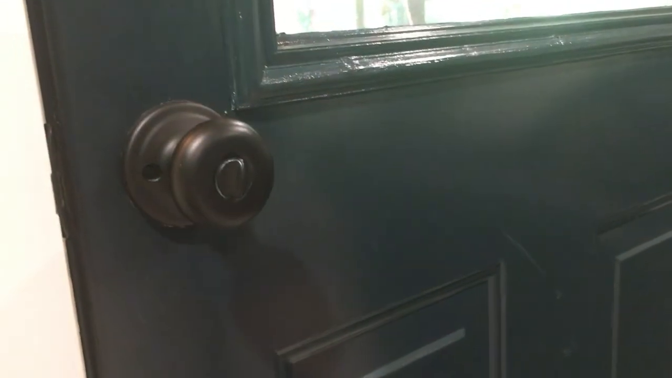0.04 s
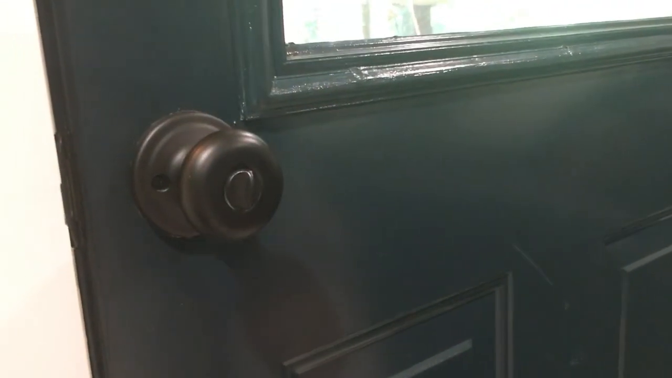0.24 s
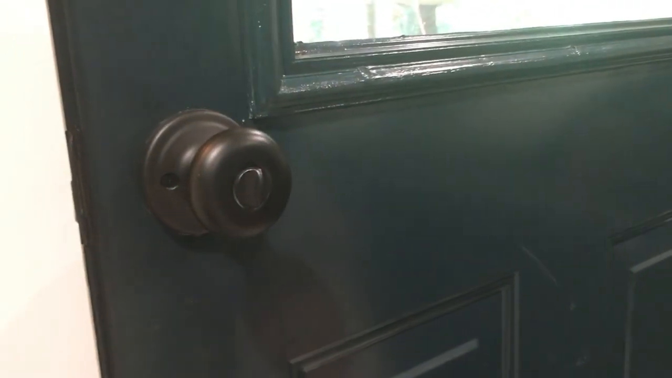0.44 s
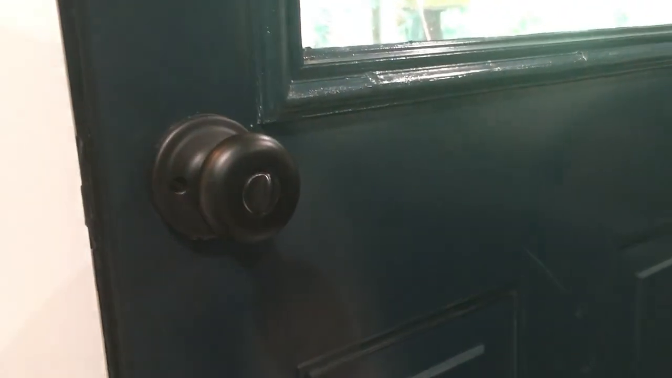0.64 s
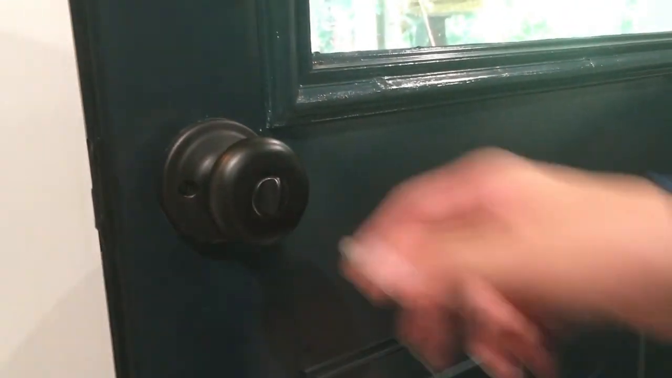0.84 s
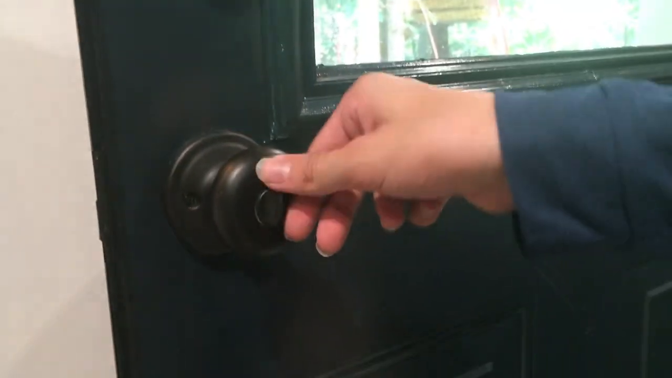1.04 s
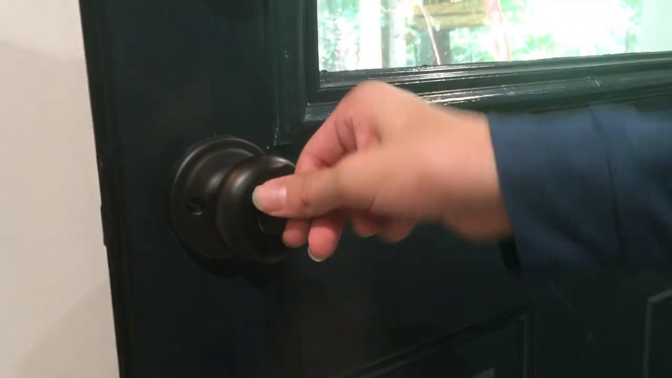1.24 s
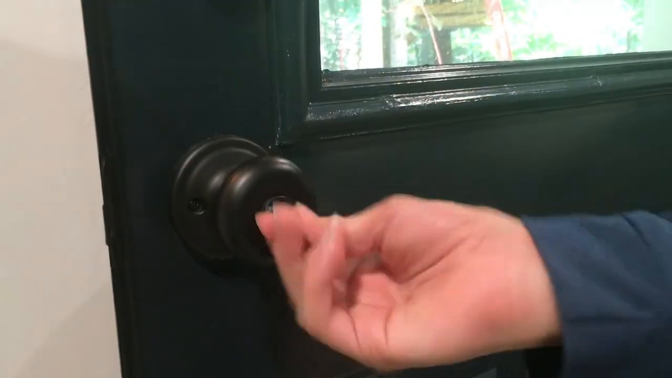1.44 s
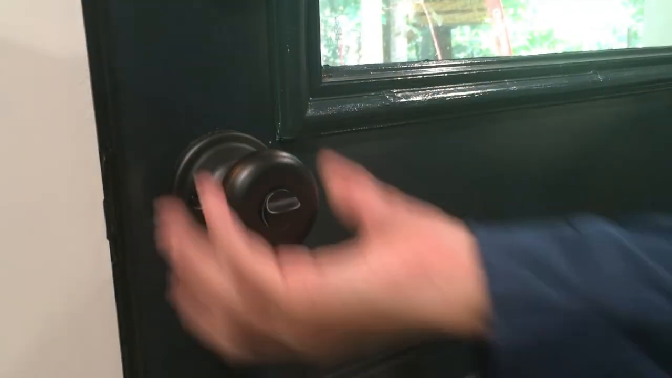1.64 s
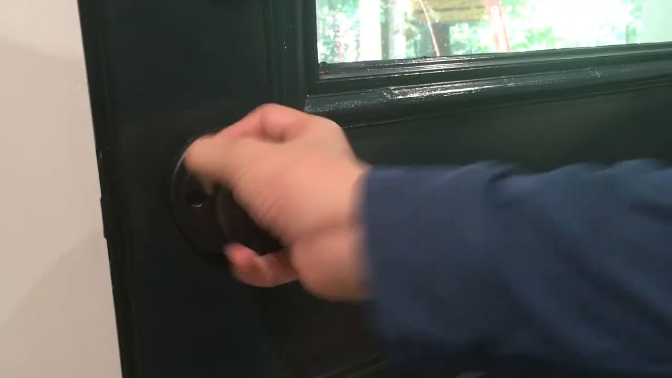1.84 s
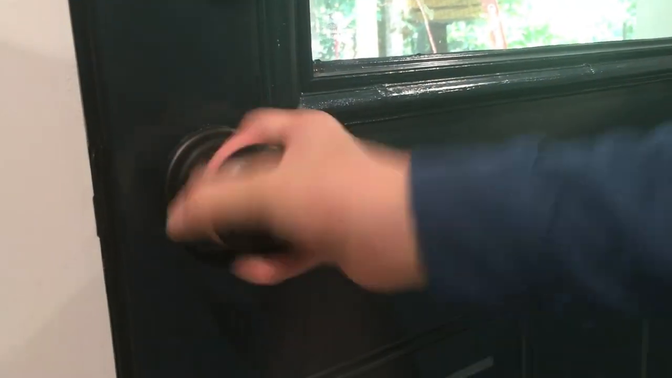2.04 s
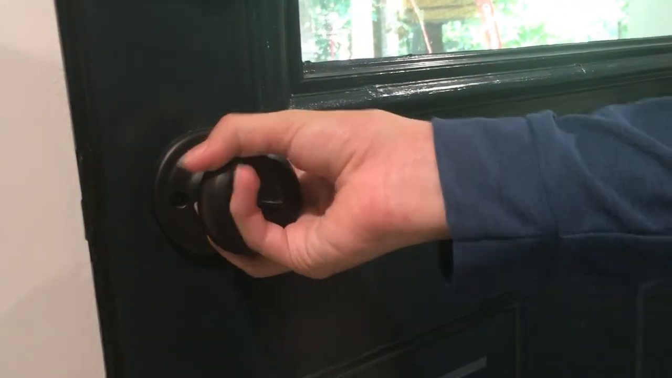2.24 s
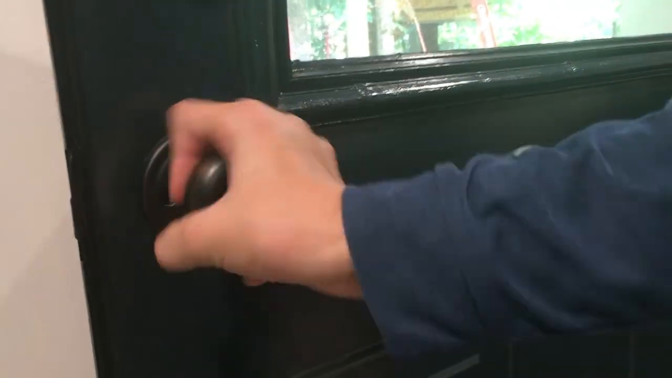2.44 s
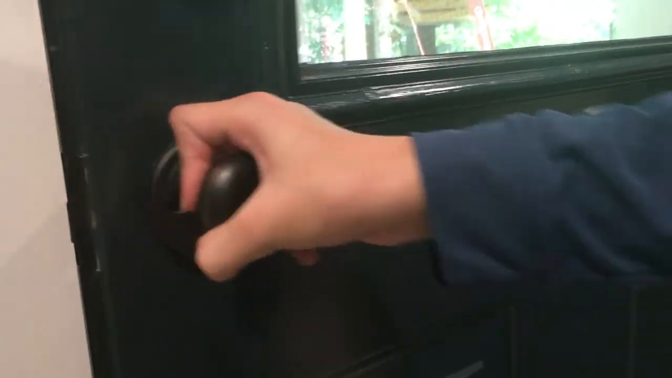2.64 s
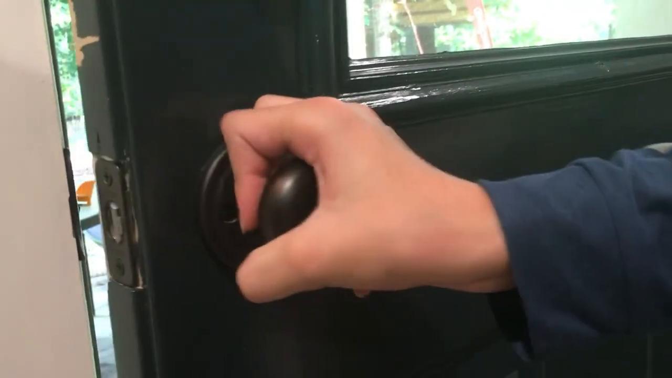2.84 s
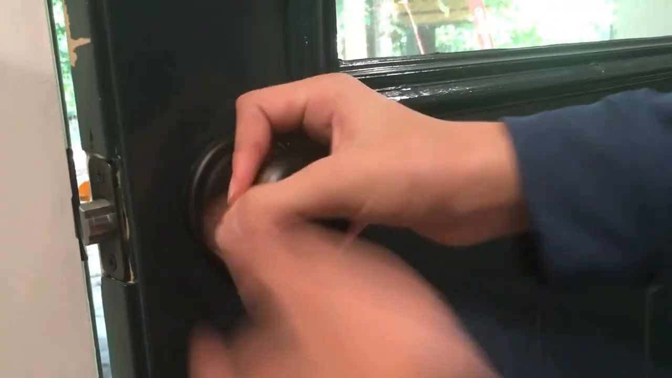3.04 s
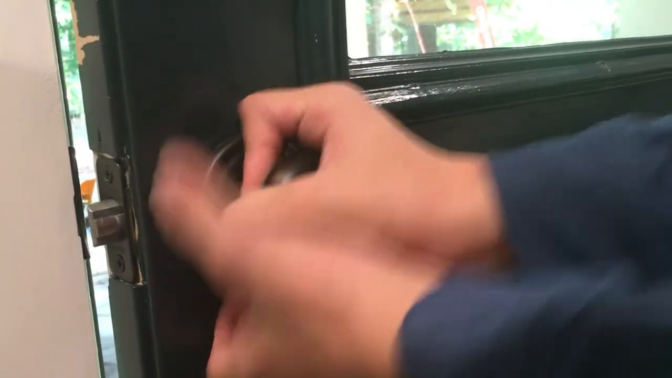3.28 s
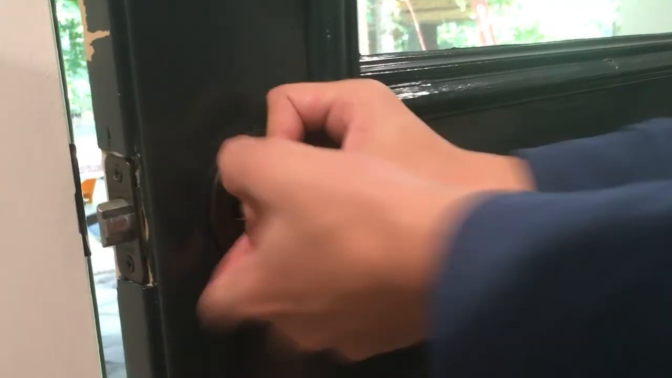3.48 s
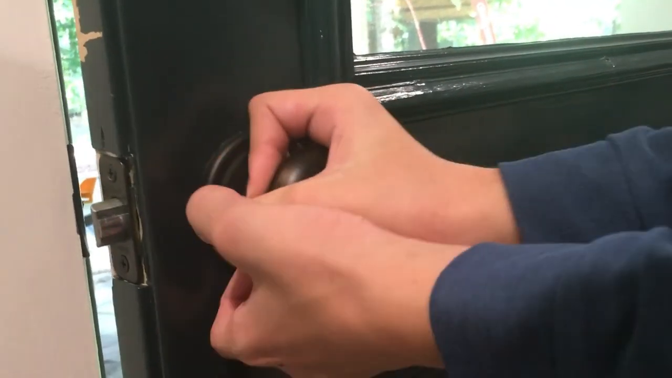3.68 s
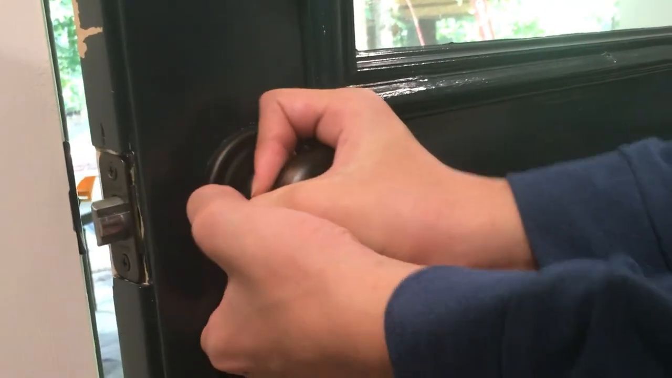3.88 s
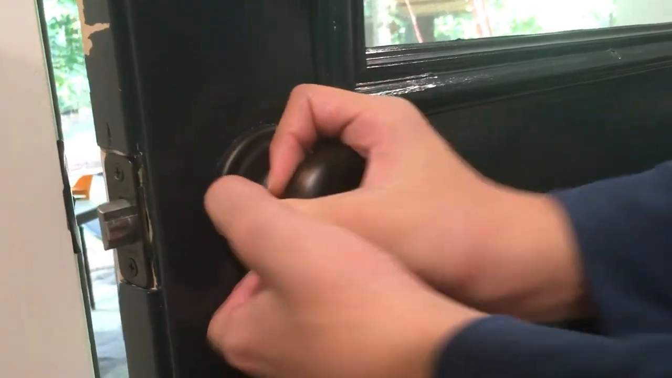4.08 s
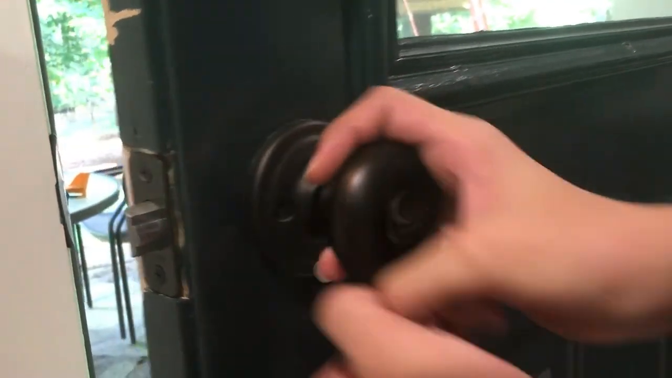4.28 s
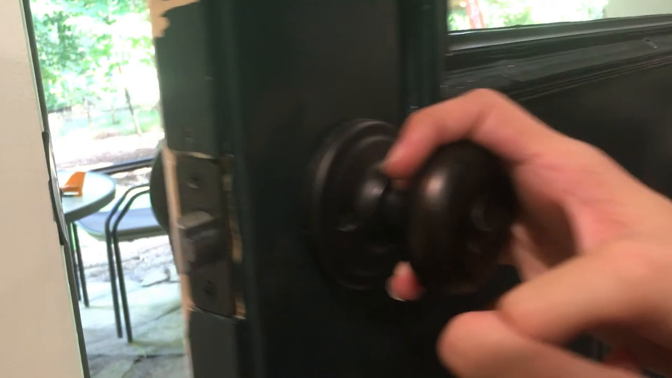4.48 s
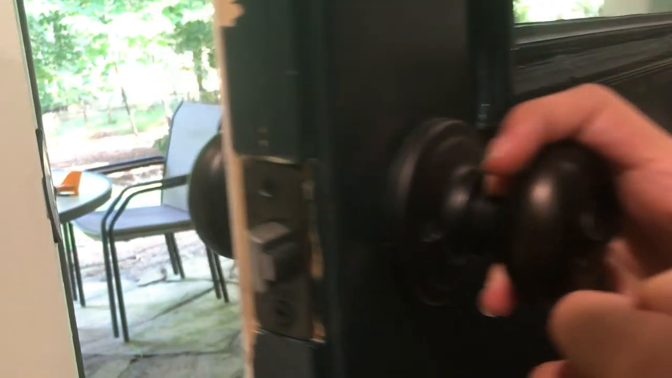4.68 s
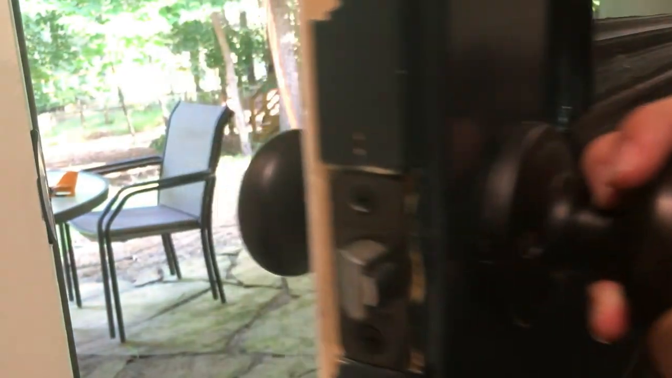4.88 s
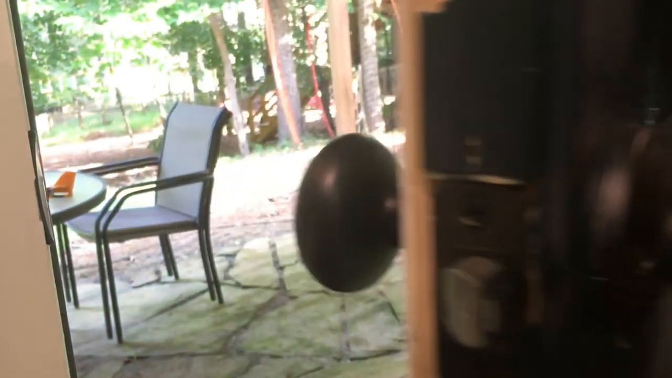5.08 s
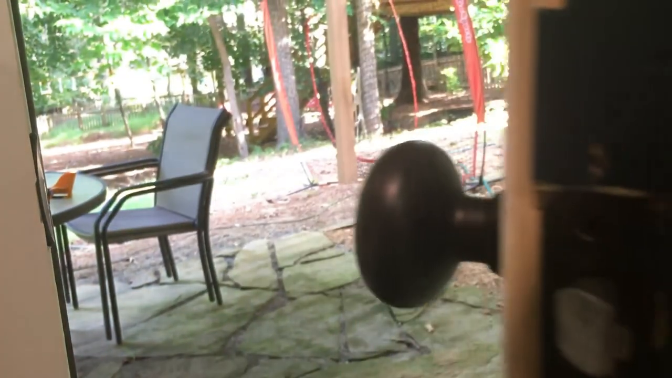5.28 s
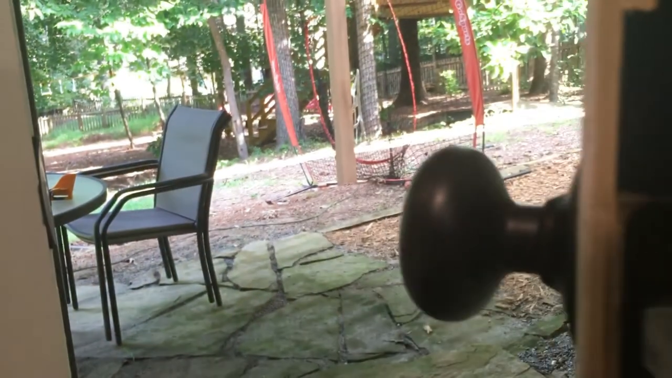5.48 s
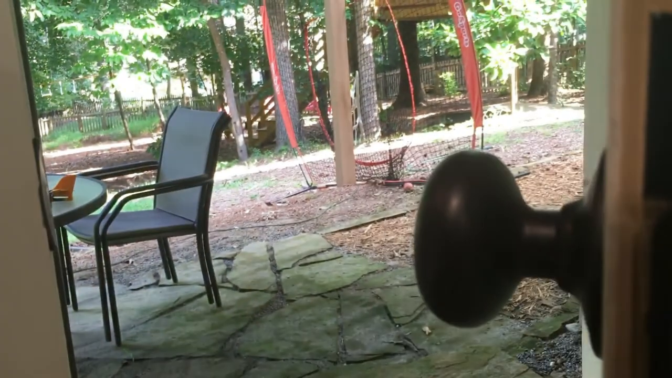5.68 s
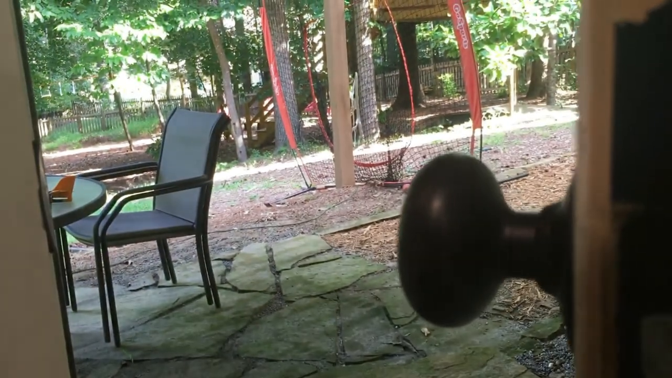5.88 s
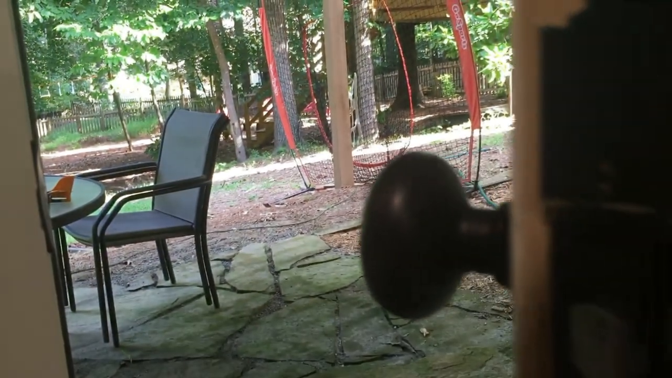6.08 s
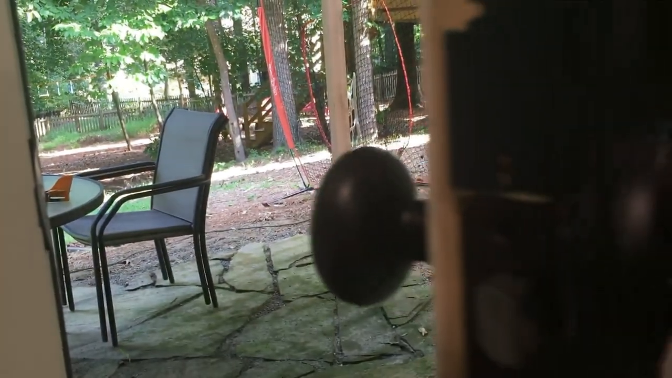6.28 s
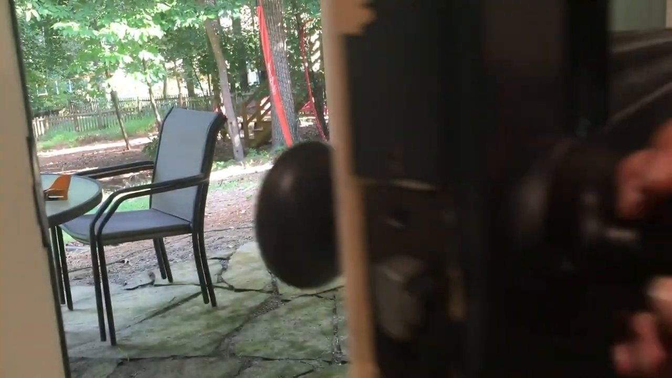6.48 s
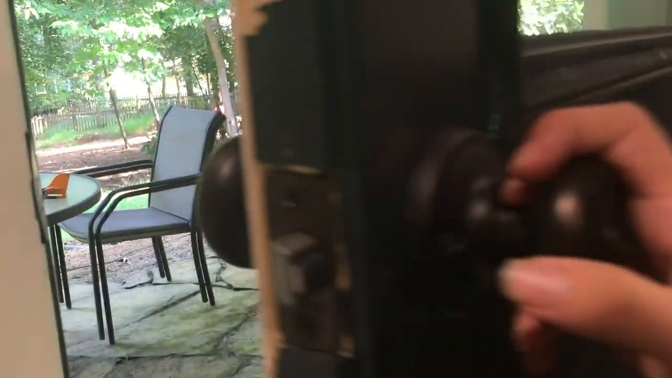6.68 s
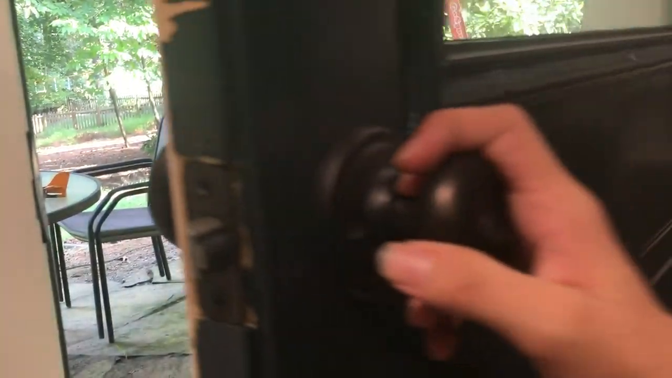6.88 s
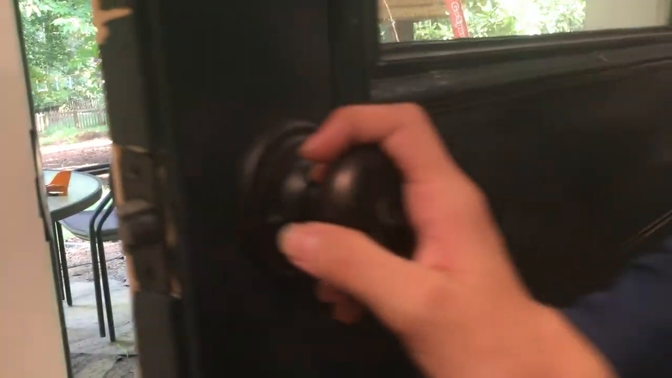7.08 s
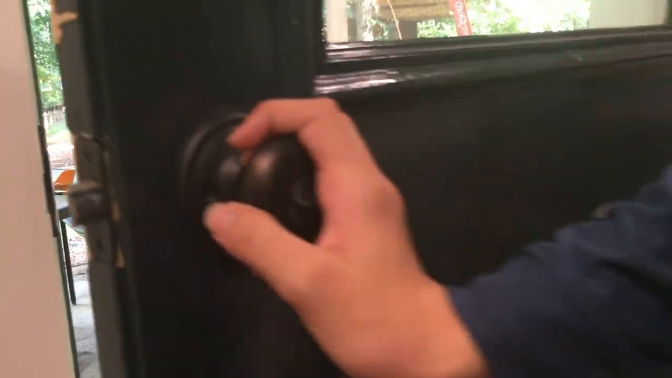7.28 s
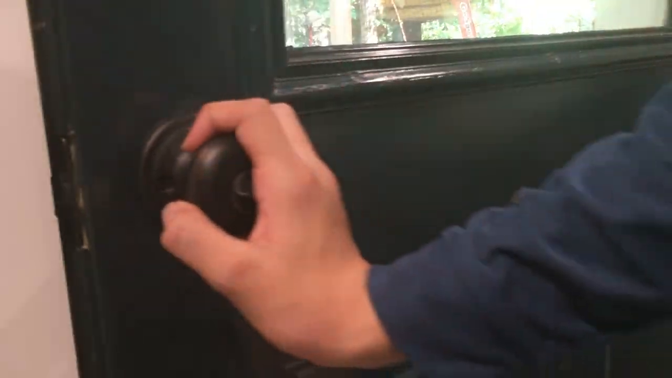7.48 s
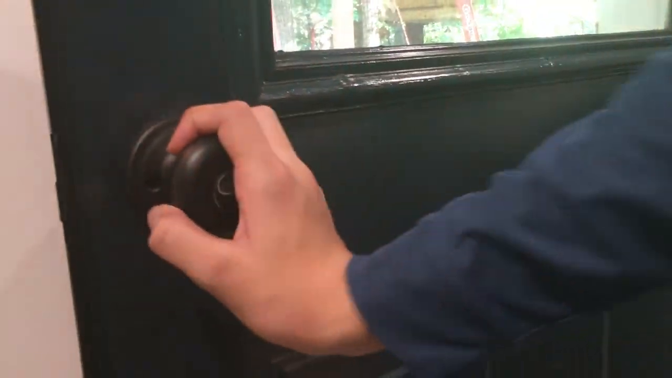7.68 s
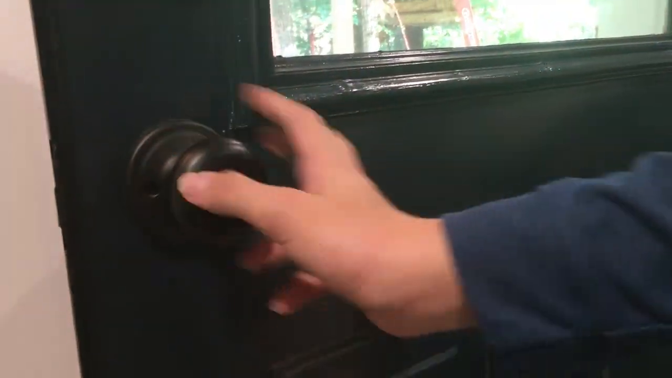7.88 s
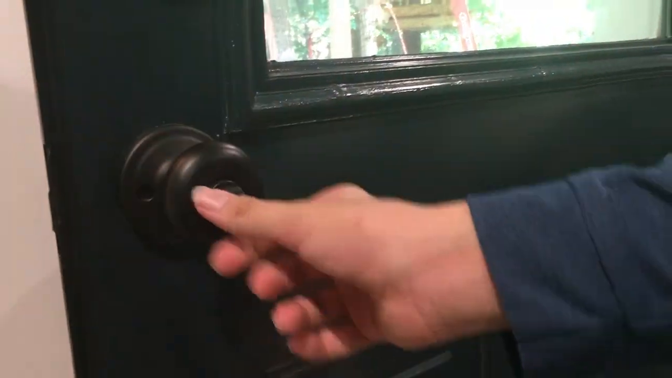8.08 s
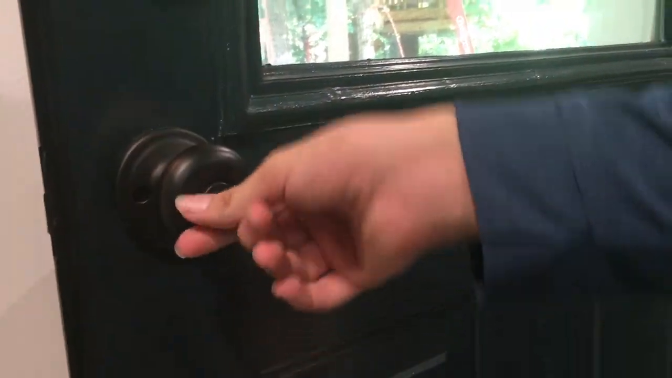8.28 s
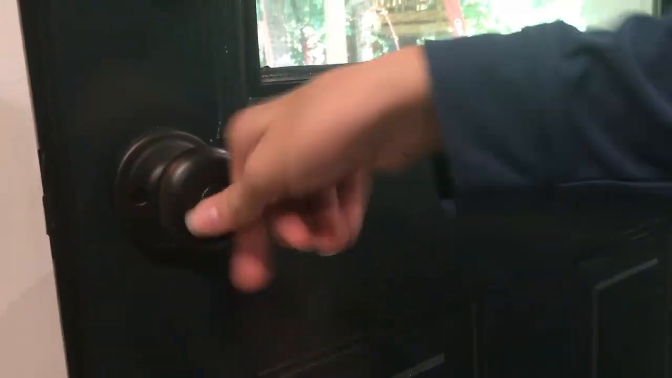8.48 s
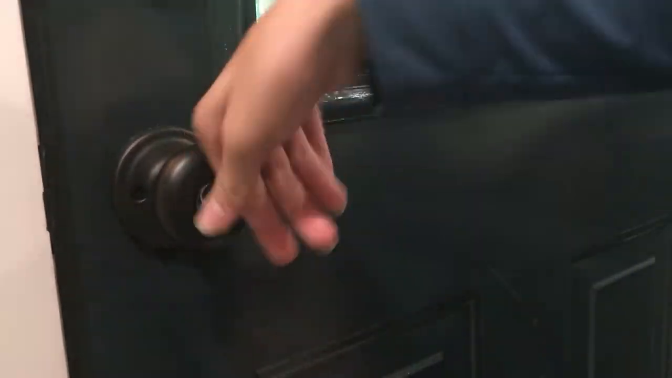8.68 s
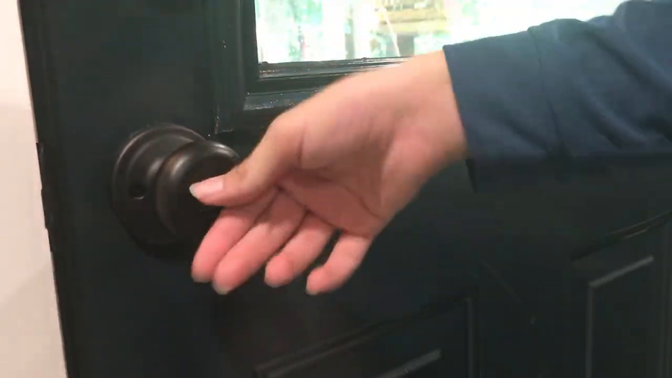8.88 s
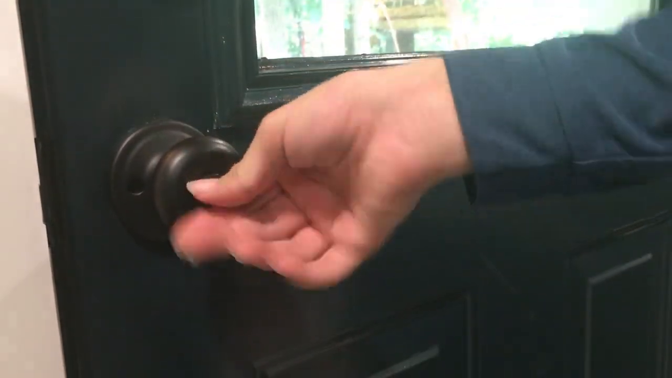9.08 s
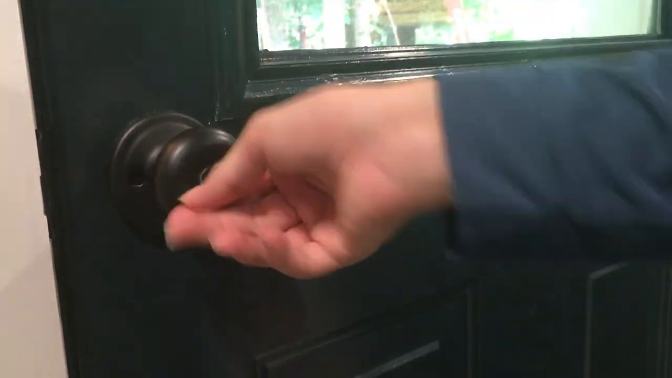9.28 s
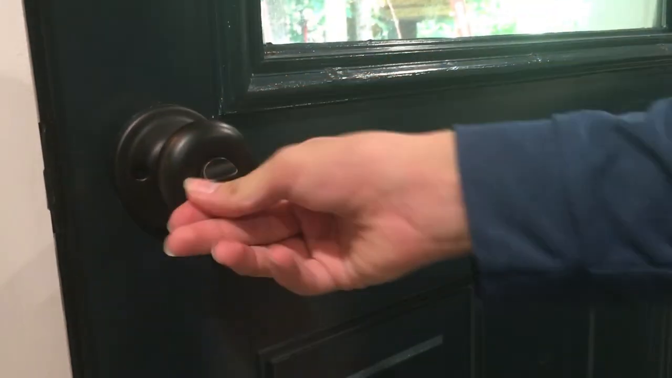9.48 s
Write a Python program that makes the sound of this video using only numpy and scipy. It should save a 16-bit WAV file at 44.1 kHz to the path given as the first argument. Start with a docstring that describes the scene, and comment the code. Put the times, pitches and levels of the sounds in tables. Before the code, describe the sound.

Close clicks and clacks of a door lock and knob, a creaky swing open and back, a heavy slam, then small lock clicks.

```python
"""In a small hall at a house door, the microphone close to the lock: a hand works the lock and metal knob
and pulls the door off its seal. Knocks and snaps are noise bursts and decaying modes; sliding is random catches.
Farther off, two hinges creak as pulse trains while the door swings open and back.
Insects, as pulsing noise, and a far rumble come in by the gap, over a quiet floor of noise.
The latch meets the strike plate, the door thuds shut in its low modes, and the lock is turned again."""
import sys
import numpy as np
from scipy import signal
from scipy.fft import rfft, irfft, next_fast_len
from scipy.io import wavfile
from scipy.ndimage import uniform_filter1d, map_coordinates

SR = 44100
rng = np.random.default_rng(int(sys.argv[2]) if len(sys.argv) > 2 else 0)


def wav_out(sig):
    """Save sig, one row per channel (or a flat mono array), as 16-bit PCM at SR to the path in sys.argv[1]."""
    wavfile.write(sys.argv[1], SR, np.round(np.clip(np.atleast_2d(sig).T, -1, 1) * 32767).astype(np.int16))


N = 420273  # length in samples

# Levels in the tables are relative: filters and mix gains set the final loudness.


def amp(db):
    """Decibels to gain."""
    return 10 ** (np.asarray(db) / 20)


def unit(x):
    """Scale to rms 1."""
    return x / np.sqrt(np.mean(x ** 2) + 1e-20)


def along(points, hz):
    """Read (f/Hz, value) points on a log frequency axis."""
    f, v = np.transpose(points)
    return np.interp(np.log(hz + 1), np.log(f), v)


def curves(rows):
    """One value per sample for each column after the time."""
    s, *cols = np.transpose(rows)
    return [np.interp(np.arange(N) / SR, s, c) for c in cols]


def wobble(rate):
    """A smooth random curve, rate knots a second."""
    knots = rng.standard_normal(int(N * rate / SR) + 4)
    return map_coordinates(knots, [np.arange(N) * rate / SR])


def fade(t, t60):
    """Exponential decay, down 60 dB after t60 seconds."""
    return amp(-60 * t / t60)


def add(track, s, sound):
    """Mix a sound into a track, starting at s seconds."""
    start = max(round(s * SR), 0)
    track[start:start + len(sound)] += sound[:max(N - start, 0)]


def colour(x, spectrum):
    """Causal minimum-phase filter that keeps the power of white noise."""
    size = 8192
    gain = unit(amp(along(spectrum, np.fft.rfftfreq(size, 1 / SR))))
    cepstrum = irfft(np.log(gain + 1e-6))
    # folding the cepstrum forward in time makes the response causal
    cepstrum[1:size // 2] *= 2
    cepstrum[size // 2 + 1:] = 0
    response = irfft(np.exp(rfft(cepstrum)))
    return signal.oaconvolve(x, response)[:N]


def noise(spectrum):
    """Steady coloured noise of rms 1."""
    return unit(colour(rng.standard_normal(N), spectrum))


def burst(crack_t60, ring_db, ring_t60, attack):
    """A sharp crack of random signs with a weaker, longer tail behind it; times in s."""
    t = np.arange(SR // 4) / SR
    decay = fade(t, crack_t60) + amp(ring_db) * fade(t, ring_t60)
    onset = 1 - np.exp(-t / attack)
    return rng.choice([-1, 1], len(t)) * decay * onset


def ring(modes, scatter_db, detune, attack):
    """Struck modes: decaying sines whose strength and pitch are varied at random from blow to blow."""
    hz, db, t60 = np.transpose(modes)[:, :, None]
    t = np.arange(int(SR * t60.max())) / SR
    scattered_db = db + scatter_db * rng.standard_normal(db.shape)
    size = unit(amp(scattered_db)) * rng.choice([-1, 1], db.shape)
    hz = hz * (1 + detune * rng.standard_normal(hz.shape))
    partials = size * np.sin(2 * np.pi * hz * t) * fade(t, t60)
    return partials.sum(0) * (1 - np.exp(-t / attack))


def slips(rate, spread_db):
    """Random tiny catches of uneven size, rate a second on average, scaled to rms 1."""
    caught = rng.random(N) < rate / SR
    signs = rng.choice([-1, 1], N)
    return unit(caught * signs * amp(spread_db * rng.standard_normal(N)))


def press(length, rise, release):
    """Pressure of one stroke: it builds, holds and lets go; times in s."""
    t = np.arange(SR) / SR
    return (1 - np.exp(-t / rise)) * fade(np.maximum(t - length, 0), release)


# insect song outdoors: [f/Hz, level/dB]
INSECT_SPECTRUM = [(3500, -35), (4700, -25.5), (5400, -9), (6200, -6.5), (6800, 2), (7300, 5.5),
                   (7550, -10.5), (7850, -16), (9000, -30), (14000, -40)]


def buzz(pulse_hz, depth_db):
    """An insect's song is a fast, nearly regular train of rasps."""
    phase = 2 * np.pi * np.cumsum(pulse_hz * (1 + 0.014 * wobble(1.2))) / SR
    swell_db = depth_db * np.sin(phase) + .6 * wobble(12)
    return unit(noise(INSECT_SPECTRUM) * amp(swell_db))


# insects and rumble let in by the gap of the door: [t/s, level/dB]
GAP_LEVEL = [(0, -78), (2.6, -78.5), (3.6, -67), (4.1, -71), (4.6, -64.5), (5.2, -59.5), (6.3, -60.5),
             (6.9, -63.5), (7.3, -73.5), (7.5, -82)]
# far rumble outdoors: [f/Hz, level/dB]
RUMBLE_SPECTRUM = [(30, -34.5), (70, -0.5), (95, -10.5), (110, 11.5), (130, -4), (300, -13), (600, -24.5),
                   (2500, -22.5), (4500, -29), (10000, -26), (15000, -48.5)]
# quiet hall: [f/Hz, level/dB]
FLOOR_SPECTRUM = [(15, -51), (25, -18.5), (48, -7.5), (66, -1.5), (141, -11), (326, -12), (451, -20),
                  (624, -20), (887, -24), (1020, -24), (1840, -27), (2550, -28.5), (5280, -42),
                  (10100, -29), (16000, -49)]


def background():
    """Insects and far rumble come through the open door, over the quiet of the hall."""
    gap = amp(curves(GAP_LEVEL)[0])
    insects = buzz(pulse_hz=43.5, depth_db=4)
    rumble = noise(RUMBLE_SPECTRUM) * amp(2.1 * wobble(8))
    outdoors = amp(-4) * insects + amp(1) * rumble
    return gap * outdoors + amp(-63.5) * noise(FLOOR_SPECTRUM)


# echo decay of the hall: [f/Hz, t60/s]
HALL_DECAY = [(100, 0.9), (400, 0.34), (1500, 0.44), (3000, 0.32), (7000, 0.47), (14000, 0.1)]
# what the walls of the hall send back: [f/Hz, level/dB]
WALL_SPECTRUM = [(80, 3), (300, 4.5), (1500, 1), (3000, 0), (5000, -3), (9000, -7), (15000, -1)]


def hall(x):
    """The hall's echo: a tail of noise in which each frequency dies at its own speed, tinted by the walls."""
    hz, t, grid = signal.stft(rng.standard_normal(SR * 3 // 4), SR, nperseg=256)
    decay = fade(t, along(HALL_DECAY, hz)[:, None])
    tail = signal.istft(grid * decay, SR, nperseg=256)[1]
    tail *= 1 - np.exp(-np.arange(len(tail)) / SR / 0.00093)  # soft onset
    echo = signal.oaconvolve(x, tail / np.linalg.norm(tail))[:N]
    return colour(echo, WALL_SPECTRUM)


def hinge(rate, jitter, scatter_db):
    """One pulse for every slip of the pin, slightly uneven in time and size."""
    turns = np.cumsum(rate * (1 + jitter * wobble(150))) / SR
    at = np.interp(np.arange(1, int(turns[-1])), turns, np.arange(N))  # slip times in samples
    taps = at.astype(int)[:, None] + np.arange(-7, 9)
    offset = taps - at[:, None]
    pulses = np.sinc(offset) * np.cos(np.pi * offset / 16) ** 2  # placed between samples
    sizes = amp(scatter_db * rng.standard_normal((len(at), 1)))
    train = np.bincount(np.clip(taps, 0, N - 1).ravel(), (pulses * sizes).ravel(), N)
    return train * np.sqrt(SR / rate)  # even power at every rate


CREAK_DB, CREAK_DB_PER_OCTAVE = -59, 3  # pulse level at an easy swing; faster is louder
EASY_HZ, STICK_HZ = 400, 65  # slip rate of an easy swing; slower than STICK_HZ a pin holds


def squeak_gain(rate):
    """A pin is all but silent while it holds and grows louder with its slip rate."""
    level_db = CREAK_DB + CREAK_DB_PER_OCTAVE * np.log2(rate / EASY_HZ)
    return amp(level_db) / (1 + (STICK_HZ / rate) ** 4)


# the door slows, rests and swings back; its speed sets the upper hinge's rate: [t/s, slip rate/Hz]
UPPER_SLIPS = [(4.8, 1200), (4.88, 703), (5.0, 638), (5.1, 594), (5.2, 472), (5.3, 390), (5.4, 315),
               (5.66, 85), (5.72, 10.4), (5.85, 10.4), (5.94, 180), (6.1, 280), (6.3, 430), (6.45, 515),
               (6.6, 600), (6.72, 720), (6.86, 1120)]
# the lower hinge catches only on the way back: [t/s, slip rate/Hz]
LOWER_SLIPS = [(5.85, 9.7), (6.1, 212), (6.3, 316), (6.44, 350), (6.52, 440), (6.58, 535), (6.8, 590)]
# the door that both hinges sound through: [f/Hz, level/dB]
HINGE_SPECTRUM = [(150, -20), (400, -11.5), (600, -4), (780, 2.5), (1000, -7.5), (1300, 1.5), (1580, -10.5),
                  (1900, -7), (2300, -2.5), (2550, -13), (3200, -9.5), (4200, -33.5), (8000, -38.5)]
LOWER_DB = -1  # lower hinge against the upper
GLIDE_HZ, GLIDE_STEEPNESS = 738, 30  # faster than this slip rate a pin glides freely
SMOOTH_HZ, ROUNDED_DB = 647, 2.5  # slip rate at which the pulses turn round, and their gain


def creak():
    """Two dry hinges creak at their own rates through the same door, and fall silent when it swings fast."""
    upper_rate, = curves(UPPER_SLIPS)
    lower_rate, = curves(LOWER_SLIPS)
    upper = hinge(upper_rate, jitter=.003, scatter_db=.8) * squeak_gain(upper_rate)
    lower = hinge(lower_rate, jitter=.005, scatter_db=1) * squeak_gain(lower_rate)
    catching = 1 / (1 + (upper_rate / GLIDE_HZ) ** GLIDE_STEEPNESS)
    pulses = catching * (upper + amp(LOWER_DB) * lower)
    sharp = 1 / (1 + (upper_rate / SMOOTH_HZ) ** 12)  # fast slips lose their edge and sing
    rounded = uniform_filter1d(pulses, size=15)
    return colour(sharp * pulses + (1 - sharp) * amp(ROUNDED_DB) * rounded, HINGE_SPECTRUM)


SHUT_S, SHUT_DB = 7.63, -22.5  # the leaf lands in its frame
# rocking on the seal: first gap in s, each gap over the last, loss each time in dB
REBOUND_S, REBOUND_SLOWS, REBOUND_LOSS_DB = .046, 1.5, 8


def rebounds(count):
    """The shut door rocks on its seal, ever slower and weaker: rows of (t/s, level/dB)."""
    k = np.arange(count)
    gaps = REBOUND_S * REBOUND_SLOWS ** k
    times = SHUT_S + np.cumsum(gaps) - gaps
    return list(zip(times, SHUT_DB - REBOUND_LOSS_DB * k))


# jolts that set the whole door leaf booming: [t/s, level/dB]
JOLTS = [(.641, -46.5), (.928, -44.5), (1.828, -39), (1.996, -47), (2.572, -42.5), (3.029, -38.5),
         (3.63, -42), (7.435, -37), (7.555, -43)]
# bending of the leaf: [f/Hz, level/dB, t60/s]
LEAF_MODES = [(50, -5.5, 0.28), (67.64, -2.5, .55), (85.3, -10, 0.68), (110, -7, 0.78), (131.1, 2.5, 0.39),
              (174.7, -8.5, 0.51), (194, -18, 0.81)]
# door skin, also knocked by strokes, flesh and lock: [f/Hz, level/dB]
SKIN_SPECTRUM = [(40, -34.5), (90, -2), (130, -1), (190, 0), (260, -1.5), (370, -2.5), (450, -5.5),
                 (900, -23.5), (3000, -71)]


def leaf():
    """The heavy leaf swings in its low modes, cushioned by the seal; each jolt also knocks its skin."""
    boom, knock = np.zeros((2, N))
    for s, db in list(JOLTS) + rebounds(count=4):
        add(boom, s, amp(db - 2.5) * ring(LEAF_MODES, scatter_db=1.5, detune=.025, attack=.008))
        skin = burst(crack_t60=0.077, ring_db=-8.5, ring_t60=.22, attack=0.0022)
        add(knock, s, amp(db - 1.5) * skin)
    return boom + colour(knock, SKIN_SPECTRUM)


# the leaf judders as it leaves the frame, and rattles as it comes home: [t/s, length/s, level/dB]
JUDDER_STROKES = [(2.602, 0.14, -37.5), (3.028, 0.033, -37.5), (7.614, 0.026, -29), (7.655, 0.041, -46)]
# resonances of the frame: [f/Hz, level/dB]
FRAME_SPECTRUM = [(300, -32.5), (600, -9.5), (790, -5), (1050, -3), (1420, 7), (1750, -2.5), (2200, -6),
                  (3000, -8.5), (4200, -24.5), (9000, -38)]


def judder():
    """Dense catches between leaf and frame, heard through the frame's resonances."""
    force = np.zeros(N)
    for s, length, db in JUDDER_STROKES:
        add(force, s, amp(db) * press(length, rise=0.0013, release=0.031))
    return colour(force * slips(rate=4000, spread_db=1.5), FRAME_SPECTRUM)


# fingers, palm and seal bump the door softly: [t/s, level/dB]
SOFT_BUMPS = [(.002, -44), (.18, -41), (.52, -48), (.565, -35), (.611, -37), (1.035, -33.5), (1.387, -33),
              (1.684, -54.5), (1.913, -35), (1.965, -40), (2.32, -45), (2.556, -40), (2.631, -37),
              (7.552, -38), (7.619, -23), (8.391, -44.5), (8.485, -40.5), (8.576, -40), (8.889, -46),
              (9.32, -51), (9.48, -41)]
# soft contact on the panel: [f/Hz, level/dB]
PAD_SPECTRUM = [(100, -20.5), (300, -2), (520, 2), (780, 0.5), (1150, -7), (1700, -17), (4000, -45.5)]


def bumps():
    """Flesh is soft: it wakes only the lower modes of the panel and the door skin."""
    out = np.zeros(N)
    for s, db in SOFT_BUMPS:
        add(out, s, amp(db) * burst(crack_t60=0.061, ring_db=-9, ring_t60=0.18, attack=0.0013))
    return colour(out, PAD_SPECTRUM) + amp(-4) * colour(out, SKIN_SPECTRUM)


# sliding of fingers, spindle and door seal: [t/s, length/s, grinding level/dB, hiss level/dB]
SLIDES = [(0, 0.12, -59, -76), (0.15, .16, -52, -67), (0.582, .18, -58.5, -60), (0.818, 0.076, -48.5, -52),
          (1.326, 0.085, -44, -54.5), (1.676, 0.025, -61, -47.5), (1.768, 0.087, -36, -47.5),
          (1.86, 0.26, -51, -66.5), (2.282, .25, -51.5, -61.5), (2.598, 0.22, -44, -59.5),
          (2.829, 0.15, -58, -65.5), (3.021, .03, -36, -47.5), (3.053, 0.26, -57.5, -65),
          (3.28, 0.16, -47.5, -59), (3.453, 0.045, -35.5, -50), (3.565, 0.036, -43, -45),
          (3.702, .4, -57.5, -68.5), (4.152, .3, -63, -69), (7.206, 0.26, -62.5, -87),
          (7.436, .025, -41, -60), (7.63, 0.067, -37, -44.5), (7.825, 0.037, -67.5, -58.5),
          (8.283, 0.11, -69.5, -79.5), (9.112, .23, -65, -66), (9.448, 0.075, -59.5, -72)]
# dragging in the lock: [f/Hz, level/dB]
DRAG_SPECTRUM = [(150, -14.5), (500, 2), (800, -2), (1100, -6.5), (1450, -3.5), (2100, -7.5), (3000, -8),
                 (4200, -25), (9000, -39.5)]
# sliding skin: [f/Hz, level/dB]
HISS_SPECTRUM = [(2060, -44.5), (3500, -9.5), (4080, -15.5), (5090, -13.5), (6050, -3), (7270, -8),
                 (10400, 6), (12500, -9), (16000, -22)]


def sliding():
    """Stick and slip: coarse catches grind in the lock and the door skin, fine ones hiss in clumps."""
    grind, hiss = np.zeros((2, N))
    for s, length, grind_db, hiss_db in SLIDES:
        pressure = press(length, rise=0.0052, release=.012 + .5 * length)  # long strokes trail off
        add(grind, s, amp(grind_db) * pressure)
        add(hiss, s, amp(hiss_db) * pressure)
    coarse = grind * slips(rate=1400, spread_db=1.5) * unit(amp(3.3 * wobble(70)))
    fine = hiss * slips(rate=7600, spread_db=4) * unit(amp(2.2 * wobble(160)))
    grinding = amp(-4) * colour(coarse, DRAG_SPECTRUM) + amp(-8.5) * colour(coarse, SKIN_SPECTRUM)
    return grinding + amp(1) * colour(fine, HISS_SPECTRUM)


# pings of the spring in the knob: [t/s, level/dB]
SPRING_PINGS = [(1.01, -38), (1.187, -37), (1.497, -30), (2.102, -30.5), (2.272, -45), (2.317, -39.5),
                (2.346, -39), (7.615, -23.5), (8.133, -42.5), (8.565, -47.5)]
# ringing of the spring: [f/Hz, level/dB, t60/s]
SPRING_MODES = [(6400, -1, 0.04), (6040, -20, .12), (9510, -14.5, .012)]
# metal on metal, in spring and lock: [f/Hz, level/dB]
EDGE_SPECTRUM = [(2350, -37.5), (4000, -14.5), (4210, -29.5), (4490, -11.5), (5630, -9), (6220, -4.5),
                 (7660, -5.5), (9010, -4.5), (9770, 0), (10400, -1), (11500, -7), (13300, -17.5),
                 (16000, -24)]


def spring():
    """The small return spring ticks and rings when the knob shifts."""
    tone, tick = np.zeros((2, N))
    for s, db in SPRING_PINGS:
        add(tone, s, amp(db - 11.5) * ring(SPRING_MODES, scatter_db=1.5, detune=.004, attack=.0004))
        contact = burst(crack_t60=0.0087, ring_db=-32.5, ring_t60=0.054, attack=0.00041)
        add(tick, s, amp(db - 4) * contact)
    return tone + colour(tick, EDGE_SPECTRUM)


# knob and spindle knock in the lock case: [t/s, strength/dB, hardness (metal edge over the clack)/dB]
KNOB_KNOCKS = [(.164, -47.5, -16), (.274, -56, 4), (.56, -45.5, -10.5), (.899, -41.5, 7.5),
               (.95, -67.5, 21), (1.009, -53.5, 13), (1.028, -34.5, -11), (1.215, -44, -15),
               (1.309, -40.5, -11.5), (1.352, -32.5, 3.5), (1.373, -47, 6), (1.416, -49.5, 15.5),
               (1.428, -37.5, -0.5), (1.496, -31.5, -0.5), (1.528, -39.5, 1), (1.682, -61, 24.5),
               (1.78, -32.5, -8), (1.821, -30.5, 0), (1.84, -34.5, 12.5), (1.913, -42.5, -12),
               (2.004, -39.5, 7.5), (2.103, -33, -6), (2.319, -43.5, -5), (2.428, -32.5, 0),
               (2.605, -34.5, -7), (2.663, -34.5, -23), (2.715, -39.5, -25), (3.011, -60, 25),
               (3.028, -32.5, 0), (3.087, -46, 10), (3.1, -41.5, 3), (3.125, -47.5, 20), (3.212, -40.5, -6),
               (3.325, -50, 3), (3.337, -43, 8.5), (3.475, -34.5, -3.5), (3.545, -35, 1.5),
               (3.583, -40, -28), (3.624, -39.5, -12), (3.804, -49, -11), (4.925, -59.5, 12),
               (7.5, -49.5, 14), (7.616, -22, 6.5), (7.85, -70, 24.5), (8.389, -55.5, -11),
               (8.461, -42.5, -3.5), (8.478, -37.5, -5.5), (8.565, -41, -17), (8.711, -58.5, -9),
               (8.791, -42, -16), (8.887, -52.5, -14), (9.232, -58.5, -16), (9.292, -52, 3),
               (9.454, -46, -9.5), (9.521, -46, -30)]
# the latch bolt snaps against its stop or the strike plate: [t/s, strength/dB, hardness/dB]
BOLT_SNAPS = [(1.0285, -33.5, -2.5), (1.751, -42.5, -11), (2.0094, -26.5, -16), (2.083, -31, -4),
              (2.0903, -34, -2), (2.272, -47, -18), (2.367, -38.5, -2), (2.412, -33, 2), (2.422, -37.5, -8),
              (4.473, -49.5, -19), (7.4355, -32, -6), (7.4622, -30, 11.5), (7.6189, -25.5, -9.5),
              (7.63, -19.5, -1.5), (7.674, -30.5, -17)]
BOLT_SHAKE_DB, SOFT_DAMPING = -2.5, 0.77  # a knock shakes the bolt; dB less for each dB of softness
CASE_SHAKE_DB = -10.5  # a snap of the bolt shakes the lock case
# loose play of the knob, against the stroke that stirs it
RATTLE_DB, RATTLE_SPREAD_DB, RATTLE_HARDNESS_DB = -4, 2, 3


def blows():
    """Knocks, snaps and chance rattles under each stroke: (t/s, case/dB, bolt/dB, metal edge/dB)."""
    knocks = list(KNOB_KNOCKS)
    for s, length, grind_db, hiss_db in SLIDES:
        for when, size in rng.random(size=(2, 2)):  # two rattles a stroke
            rattle_db = grind_db + RATTLE_DB + RATTLE_SPREAD_DB * (2 * size - 1)
            hardness_db = hiss_db - grind_db + RATTLE_HARDNESS_DB
            knocks.append((s + when * length, rattle_db, hardness_db))
    rows = []
    for s, db, hard in knocks:
        bolt_db = db + BOLT_SHAKE_DB + SOFT_DAMPING * min(hard, 0)
        rows.append((s, db, bolt_db, db + hard))
    for s, db, hard in BOLT_SNAPS:
        rows.append((s, db + CASE_SHAKE_DB, db, db + hard))
    return rows


# lock case in the door: [f/Hz, level/dB]
CASE_SPECTRUM = [(150, -37), (300, -7.5), (420, -3), (520, -2), (700, -4), (950, -5.5), (1400, 2),
                 (1900, -0.5), (2400, -9), (3100, -13), (4000, -22.5), (6500, -40.5), (11000, -71)]
# hollow knob, damped by the hand: [f/Hz, level/dB, t60/s]
KNOB_MODES = [(5730, -6, 0.013), (6780, -5.5, 0.017), (9215, 3, 0.0096), (10340, 2, 0.012),
              (11440, -4.5, 0.0062)]
# latch bolt and spindle, well damped by grease: [f/Hz, level/dB, t60/s]
BOLT_MODES = [(2000, -2, .014), (2270, 0, .014), (2550, -1, .012), (2850, 0, .014), (3120, -2, .016),
              (3430, -4, .016), (4900, -11, .016)]
# thin round plate behind the knob: [f/Hz, level/dB, t60/s]
ROSE_MODES = [(3484, 1.5, 0.034), (5020, -14, .09)]
# ringing of the door panel with its lock: [f/Hz, level/dB, t60/s]
PANEL_MODES = [(237.7, -6.5, 0.32), (371, -5, 0.189), (521.8, 1, 0.24), (699, -1.5, 0.17),
               (834, -10, 0.099), (1075, -4.5, 0.23), (1280, -3, 0.16), (1328, -5.5, 0.25),
               (1645, 5.5, 0.12), (1780, -5.5, 0.069), (2130, -9, 0.04)]
# a firm clack, the door skin's answer to it, dB more for each dB of clack
FIRM_DB, SKIN_DB, SKIN_GROWS = -40, -45, 0.69
ROSE_DB = -6  # plate's ring against the weaker of case and bolt: soft knocks barely wake it


def lockwork():
    """Each contact cracks in the metal, rings knob, bolt and plate, clacks in the case and knocks on the panel."""
    clack, edge, knock, modes = np.zeros((4, N))
    for s, clack_db, bolt_db, edge_db in blows():
        crack = burst(crack_t60=.0065, ring_db=-20, ring_t60=.065, attack=.0005)
        add(edge, s, amp(edge_db + 7.5) * crack)
        case = burst(crack_t60=0.027, ring_db=-14, ring_t60=0.065, attack=0.00091)
        add(clack, s, amp(clack_db + 5) * case)
        knock_db = SKIN_DB + SKIN_GROWS * (clack_db - FIRM_DB)
        skin = burst(crack_t60=.05, ring_db=-7.5, ring_t60=0.22, attack=0.0018)
        add(knock, s, amp(knock_db + 2.5) * skin)
        add(modes, s, amp(edge_db) * ring(KNOB_MODES, scatter_db=8.5, detune=.07, attack=0.00071))
        add(modes, s, amp(bolt_db + 2) * ring(BOLT_MODES, scatter_db=0.5, detune=.05, attack=0.00024))
        rose_db = min(clack_db, bolt_db) + ROSE_DB
        add(modes, s, amp(rose_db) * ring(ROSE_MODES, scatter_db=4, detune=.008, attack=.0003))
        add(modes, s, amp(clack_db - 14) * ring(PANEL_MODES, scatter_db=1.5, detune=0.016, attack=.002))
    noises = colour(clack, CASE_SPECTRUM) + colour(edge, EDGE_SPECTRUM) + colour(knock, SKIN_SPECTRUM)
    return noises + modes


def scene():
    """The knob is close to the microphone and fairly dry; the hinges are farther off and wetter."""
    outside = background()
    hinges = creak()
    near = judder() + bumps() + sliding() + spring() + lockwork()
    echo = hall(amp(-13) * near + amp(-5) * hinges)
    return (outside + echo + hinges + leaf() + near)[None]


TOP_HZ = 16000  # upper band limit


def record(dry):
    """The recorder rolls off very steeply above its band limit."""
    size = next_fast_len(N + SR // 2)
    hz = np.fft.rfftfreq(size, 1 / SR)
    rolloff = np.sqrt(1 + (hz / TOP_HZ) ** 120)
    return irfft(rfft(dry, size) / rolloff, size)[:, :N]


dry = scene()
out = record(dry)
wav_out(out)
```